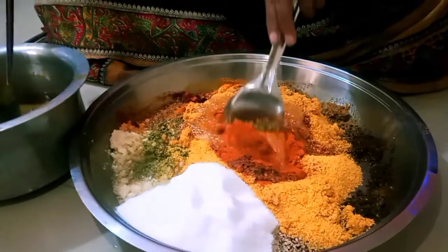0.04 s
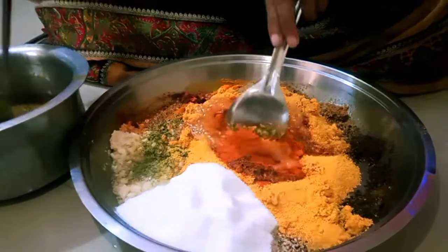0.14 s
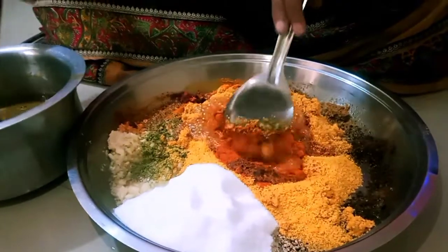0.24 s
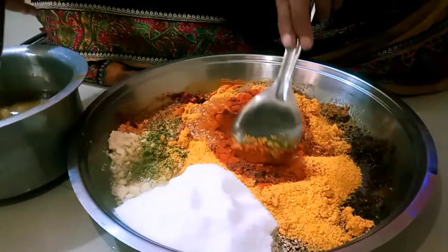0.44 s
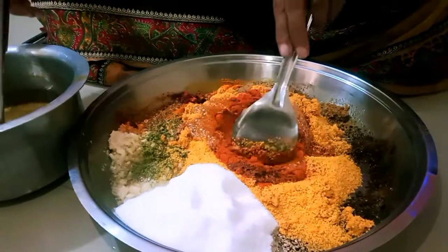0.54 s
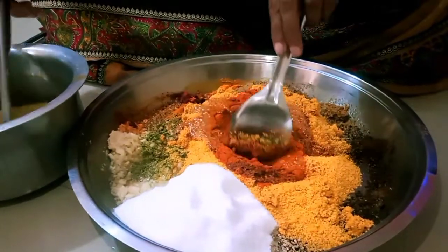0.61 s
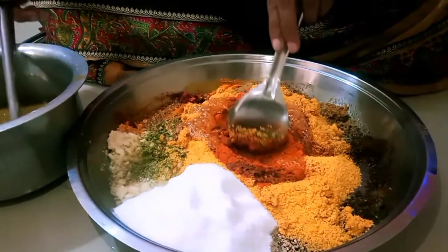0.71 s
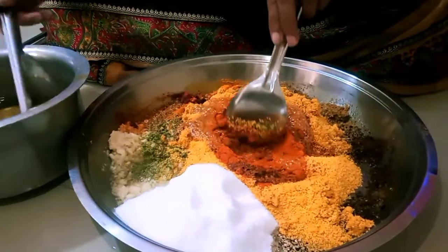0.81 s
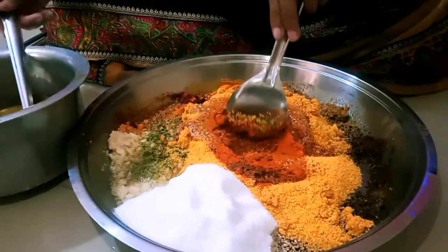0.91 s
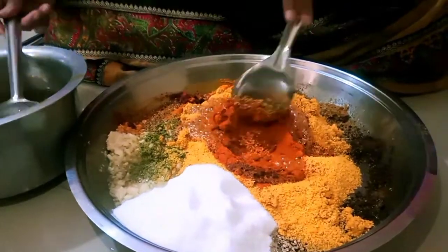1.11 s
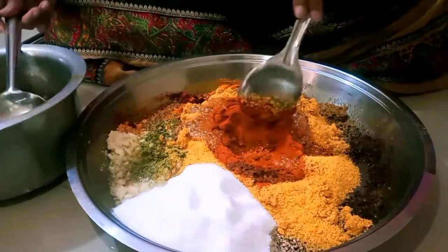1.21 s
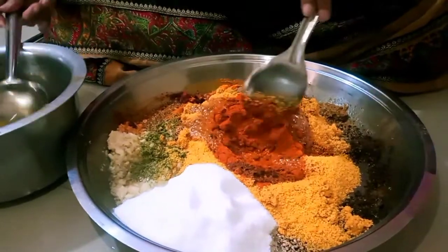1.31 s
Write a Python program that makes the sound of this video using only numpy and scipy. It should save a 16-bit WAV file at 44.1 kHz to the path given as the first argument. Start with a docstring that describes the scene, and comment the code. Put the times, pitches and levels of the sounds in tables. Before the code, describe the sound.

Metal ladle clinking against a metal bowl, with a gritty stir of powder and soft oil sizzle

```python
"""A small kitchen hums while hot oil fizzes softly, as noise and random clicks, from start to end.
A steel ladle clinks, a set of decaying partials, then scrapes along steel as a rasp with wavering tones.
It strikes the steel bowl, then taps once more, damped by the powdered spices it works into the oil.
A gritty rustle of filtered clicks follows, with dull low bumps and popping bubbles, all decaying sines."""
import sys
import numpy as np
from scipy import signal
from scipy.fft import rfft, irfft
from scipy.io import wavfile
from scipy.ndimage import uniform_filter1d

SR = 44100
rng = np.random.default_rng(int(sys.argv[2]) if len(sys.argv) > 2 else 0)


def pcm_store(signal):
    """Save signal as 16-bit PCM."""
    levels = np.round(np.clip(np.atleast_2d(signal), -1, 1) * 32767)
    wavfile.write(sys.argv[1], SR, levels.astype(np.int16).T)


N = 59535
T = np.arange(N) / SR  # seconds


def amp(db):
    """Decibels to gain."""
    return 10 ** (np.asarray(db) / 20)


def unit(x):
    """Scales to an rms of 1."""
    return x / np.sqrt(np.mean(x ** 2) + 1e-20)


def read(points, hz):
    """Reads a table on a log-frequency axis."""
    f, value = np.transpose(points)
    return np.interp(np.log(hz + 1), np.log(f + 1), value)


def level(points):
    """Gain over time from a curve of seconds and dB."""
    return amp(np.interp(T, *np.transpose(points)))


def add(mix, start_s, sound):
    """Mixes a sound in at its start time, cut off at the end of the mix."""
    part = mix[max(round(start_s * SR), 0):][:len(sound)]
    part += sound[:len(part)]


def colour(x, points):
    """Filters x by a spectral curve, then sets it to rms 1."""
    hz = np.fft.rfftfreq(len(x), 1 / SR)
    return unit(irfft(rfft(x) * amp(read(points, hz)), len(x)))


def even_noise():
    """Noise with a flat spectrum and random phases."""
    turns = rng.random(N // 2 + 1)
    return unit(irfft(np.exp(2j * np.pi * turns), N))


def drift(size):
    """Smooth random movement: white noise averaged twice over size samples."""
    once = uniform_filter1d(rng.standard_normal(N), size)
    return unit(uniform_filter1d(once, size))


def crackle(per_s, spread_db):
    """Tiny clicks at random moments, of random sign and uneven size."""
    sizes = amp(spread_db * np.minimum(rng.exponential(1, N), 4))
    signs = rng.choice([-1, 1], N)
    clicks = rng.random(N) < per_s / SR
    return unit(sizes * signs * clicks)


# Spectrum of the room noise. Each row: frequency in Hz, relative density in dB per Hz.
AIR_COLOUR = [(15, -62), (25, -45), (59, -8.5), (144, -5), (196, -6.5), (306, -5), (334, -10.5), (391, -8),
              (521, -15.5), (557, -5.5), (1080, -10.5), (1690, -11), (2350, -18.5), (3000, -18.5),
              (5000, -20.5), (6500, -56), (11000, -120)]
# Room noise fader. Each row: time in seconds, level in dB.
AIR_LEVEL = [(0, -47.5), (.15, -51), (.35, -42.5), (.7, -45), (.9, -49), (1.05, -49.5), (1.35, -50)]
# Steady hum lines. Each row: frequency in Hz, level in dB.
HUM_LINES = [(122, -62.5), (170, -65), (200, -59), (562, -66.5), (650, -67.5), (705, -63), (1170, -62)]


def ambience():
    """Low-passed room noise under hum lines whose phases wander."""
    low_pass = signal.butter(2, 3500, fs=SR, output="sos")
    air = signal.sosfilt(low_pass, colour(even_noise(), AIR_COLOUR))
    hum = np.zeros(N)
    for hz, db in HUM_LINES:
        phase = 2 * np.pi * hz * T + 1.1 * drift(size=2500)
        hum += amp(db) * unit(np.sin(phase))
    return level(AIR_LEVEL) * unit(air) + hum


# Fader of the fizzing oil. Each row: time in seconds, level in dB.
FIZZ_LEVEL = [(0, -48), (.04, -45.5), (.1, -51.5), (.2, -50), (.6, -49), (.9, -51.5), (1.0, -52),
              (1.15, -53.5), (1.35, -54.5)]
# Spectrum of the fizz. Each row: frequency in Hz, relative gain in dB.
FIZZ_COLOUR = [(500, -27), (2500, -7.5), (4000, -5), (5300, -6), (7300, 3), (8500, -2.5), (10000, -12),
               (15000, -14.5)]


def fizz():
    """Thousands of tiny bursts a second in the hot oil, blurred by smooth noise."""
    bursts = crackle(per_s=7300, spread_db=4)
    return level(FIZZ_LEVEL) * colour(bursts + 0.88 * even_noise(), FIZZ_COLOUR)


# Soft bumps of the ladle against the heap.
# Each row: start in seconds, pitch in Hz, level in dB before rise and decay, t60 in seconds.
HEAP_BUMPS = [(0.693, 83.66, -47, .25), (0.696, 367, -38, 0.086), (0.797, 124, -44.5, 0.24),
              (.885, 158.7, -44, .3), (1.129, 80.4, -49, 0.23), (1.197, 70, -48, 0.37)]


def bumps():
    """Soft contacts with the heap: low decaying sines with a slow 6 ms attack."""
    out = np.zeros(N)
    attack = np.minimum(T / .006, 1)
    for start_s, hz, db, t60 in HEAP_BUMPS:
        add(out, start_s, attack * amp(db - 60 * T / t60) * np.sin(2 * np.pi * hz * T))
    return out


# Bubbles and spits of oil; the first row is the bright tick of the ladle's last tap.
# Each row: start in seconds, mean pitch in Hz, level in dB before rise and decay, t60 in seconds.
SHORT_NOTES = [(.692, 7490, -23, 0.028), (0.734, 7090, -29, 0.015), (.744, 5420, -31, 0.017),
               (.771, 10000, -42, 0.017), (.779, 2004, -29, 0.033), (0.781, 4180, -35, 0.056),
               (.785, 7200, -35.5, 0.048), (0.793, 7310, -30.5, 0.024), (.814, 5560, -33, .02),
               (.858, 7050, -31, 0.029), (0.8918, 7370, -31, 0.055), (.952, 9100, -39, .012),
               (.974, 12000, -43, .01), (1.013, 3006, -45.5, 0.23), (1.015, 4380, -40, 0.025),
               (1.045, 9200, -43.5, 0.025), (1.142, 1661, -37, .05), (1.154, 1710, -40, 0.027),
               (1.184, 1700, -39, 0.029), (1.253, 2085, -40.5, 0.039), (1.313, 2100, -39, 0.027)]


def tick_and_pops():
    """The last tap's bright tick, then bursting bubbles: short decaying notes of unsteady pitch."""
    out = np.zeros(N)
    attack = np.minimum(T / .00071, 1)
    for start_s, hz, db, t60 in SHORT_NOTES:
        pitch_hz = hz * (1 + .05 * drift(size=30))
        turns = np.cumsum(pitch_hz) / SR
        add(out, start_s, attack * amp(db - 60 * T / t60) * np.sin(2 * np.pi * turns))
    return out


def kitchen(x):
    """Reflections from hard walls close by: scattered echoes after 4 ms, with a t60 of 0.21 s."""
    tail = crackle(per_s=1700, spread_db=4) * amp(-60 * T / .21) * (T > .004)
    return signal.fftconvolve(x, tail / np.linalg.norm(tail))[:N]


# Ladle pushing through the oily powder. Each row: time in seconds, level in dB.
STIR_LEVEL = [(.66, -77), (.71, -37), (.76, -43), (.81, -39.5), (.87, -44), (.91, -48.5), (.95, -59),
              (1.05, -61)]
# Spectrum of the rustling grains. Each row: frequency in Hz, relative gain in dB.
STIR_COLOUR = [(100, -3), (450, 3), (900, 6.5), (1900, 3), (2500, -2), (3150, 9), (3700, 0), (4200, 4),
               (5000, -3), (5800, 2.5), (6400, -1), (7400, 4.5), (8800, -8), (11000, -14), (15000, -16)]


def stir():
    """Gritty rustle of spice grains under the ladle: a dense run of clicks."""
    return level(STIR_LEVEL) * colour(crackle(per_s=4300, spread_db=-1.0), STIR_COLOUR)


# Ladle sliding on steel. Each row: time in seconds, level in dB.
SCRAPE_LEVEL = [(.375, -62), (.395, -42), (.408, -36), (.435, -33), (.48, -34), (.49, -55)]
# Spectrum of the rasp. Each row: frequency in Hz, relative gain in dB.
SCRAPE_COLOUR = [(100, -22), (550, -3), (1550, 0), (2000, -2), (2200, -10), (2550, 2), (2780, -5),
                 (3100, 3), (3450, -7), (3700, 0), (3950, 5), (4400, -6), (4850, 0), (5250, -13),
                 (5700, -1), (6500, -1), (7300, 3), (8300, -3), (8800, -2), (10500, -14), (15000, -20)]
# Tones that sing while the ladle is pressed on the steel. Each row: frequency in Hz, relative level in dB.
PRESSED_TONES = [(1632, -12), (2548, -3), (3172, -6), (3240, 0), (3886, -7), (3972, -8), (5013, -9)]


def scrape():
    """Quick slips of steel on steel make a fine rasp, and the pressed ladle builds up a wavering ring."""
    sliding = (T > SCRAPE_LEVEL[0][0]) * (T < SCRAPE_LEVEL[-1][0])
    push = level(SCRAPE_LEVEL) * sliding
    rasp = colour(crackle(per_s=6000, spread_db=3.5), SCRAPE_COLOUR)
    tones = np.zeros(N)
    for hz, db in PRESSED_TONES:
        tones += amp(db) * np.sin(2 * np.pi * hz * T + .6 * drift(size=500))
    # the singing follows the push with a 12 ms lag
    keep = np.exp(-1 / (.012 * SR))
    sing = signal.lfilter([1 - keep], [1, -keep], push)
    return push * rasp + sing * unit(tones)


def ring(modes, share):
    """Decaying partials of a piece of steel."""
    out = np.zeros(N)
    for hz, db, t60 in modes:
        out += amp(db - 60 * T / (t60 * share)) * np.sin(2 * np.pi * hz * T)
    return out


def weak_modes(spacing_hz=12):
    """Steady partials of uneven strength, irregularly spaced around a mean gap."""
    size, turn, chance = rng.random((3, N // 2 + 1))
    present = chance < SR / N / spacing_hz
    return irfft(present * (.5 + size) * np.exp(2j * np.pi * turn), N)


# Decay of the weak modes. Each row: frequency in Hz, t60 in seconds when undamped.
CROWD_T60 = [(400, 0.15), (1100, 0.5), (3100, 0.54), (5000, 0.36), (7400, 0.34), (10000, 0.28),
             (15000, 0.32)]


def crowd(points, share):
    """Dense weak modes of the steel, each band fading at its own rate."""
    hz, t, z = signal.stft(colour(weak_modes(), points), SR, nperseg=256)
    t60 = share * read(CROWD_T60, hz)[:, None]
    return signal.istft(z * amp(-60 * t / t60), SR, nperseg=256)[1][:N]


# Contacts of the ladle. Each row: start in seconds, ladle ring in dB, bowl ring in dB, contact tick in dB,
# share of the free ring time, seconds until the ladle chatters, chatter in dB relative to first contact.
KNOCKS = [(.2266, -18.5, -48, -24, 1.0, .0045, -2), (.4837, -36, -16, -19, 1.0, .0038, -6),
          (.6908, -34, -44, -26, .4, .008, -12)]
# Main modes of each piece. Each row: frequency in Hz, relative level in dB, t60 in seconds when undamped.
LADLE = [(856, -16, .22), (1108, -10, .24), (1314, -15, .55), (1500, -19, .45), (1960, -11, .24),
         (2365, -17, .4), (2520, -11, .33), (2600, -8, .27), (2972, -15, .6), (3212, -5, .48),
         (3262, -6, .32), (3346, -9, .5), (4062, -10, .2), (5016, -8, .24), (5917, -6, .16),
         (7033, -3, .15), (7318, -3, .19), (7598, 2, .15), (7865, -4, .13)]
BOWL = [(556, -14.5, .43), (772, -21, .45), (1304, -7, .37), (1766, -22, .5), (2532, -13, .22),
        (2622, -14, .4), (2950, -4, .3), (2990, -6, .42), (3115, 0, .16), (3260, 0, .16), (3354, -5, .28),
        (3595, -10, .22), (3833, -11, .26), (3976, -13, .33), (4178, -5, .23), (5912, -12, .22),
        (6382, -5, .16), (6688, -7, .27), (6937, -7, .15)]
# Weaker modes between them. Each row: frequency in Hz, relative density in dB per Hz.
LADLE_CROWD = [(100, -48), (700, -26), (950, -3), (1250, -9.5), (1600, -18.5), (2200, -11), (3200, -6.5),
               (3650, -9.5), (4100, -3), (4600, -9), (5500, -13.5), (6100, 1), (6600, -10.5), (7550, 3),
               (8500, -5), (10500, -15.5), (15000, -23.5)]
BOWL_CROWD = [(100, -22), (470, -37), (580, -7.5), (1200, -4), (1950, -15.5), (2500, -1.5), (2750, -9),
              (3100, 5.5), (3650, 0.5), (4250, 2.5), (5250, -13), (5900, 3), (6700, 0.5), (7600, -6.5),
              (8450, -2.5), (9500, -15), (12000, -13.5), (15000, -23)]
# Spectrum of the contact tick. Each row: frequency in Hz, relative gain in dB.
TICK_COLOUR = [(100, -24), (600, -11), (1200, -8), (3200, -3), (5000, -7), (7600, 5), (9300, -9),
               (14000, -10)]


def knocks():
    """Each contact ticks, chatters once and sets ladle and bowl ringing; damping shortens it all."""
    out = np.zeros(N)
    # the crowd starts 2.5 times as strong, falling back within some 10 ms
    direct = 1 + 1.5 * np.exp(-(T / .0085) ** 2)
    for start_s, ladle_db, bowl_db, tick_db, share, chatter_s, chatter_db in KNOCKS:
        # the ring rises in 0.5 ms and steps up when the ladle chatters
        chatter = amp(chatter_db)
        build = (1 - np.exp(-T / .0005) + chatter * (T > chatter_s)) / (1 + chatter)
        ladle = ring(LADLE, share) + amp(-1) * direct * crowd(LADLE_CROWD, share)
        bowl = ring(BOWL, share) + amp(-2) * direct * crowd(BOWL_CROWD, share)
        add(out, start_s, build * (amp(ladle_db) * ladle + amp(bowl_db) * bowl))
        for delay_s, db in ((0, 0), (chatter_s, chatter_db)):
            fade = amp(tick_db + db - 60 * T / (.016 * share))  # t60 of 16 ms when undamped
            add(out, start_s + delay_s, colour(even_noise(), TICK_COLOUR) * fade)
    return out


def scene():
    """Room, oil, powder and steel together; the short notes also get wall reflections."""
    notes = tick_and_pops()
    fizz_and_notes = fizz() + notes + amp(-2.5) * kitchen(notes)
    powder = bumps() + stir()
    steel = scrape() + knocks()
    return (ambience() + fizz_and_notes + powder + steel)[None]


def record(dry):
    """The recorder's band limit: a steep low-pass at 15.6 kHz."""
    low_pass = signal.firwin(511, 15600, window=("kaiser", 9), fs=SR)
    return signal.oaconvolve(dry, low_pass[None], "same")


dry = scene()
out = record(dry)
pcm_store(out)
```